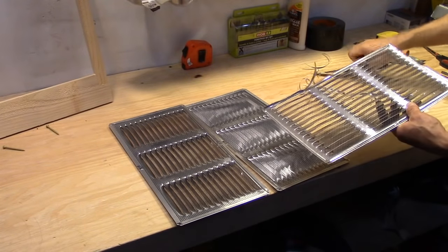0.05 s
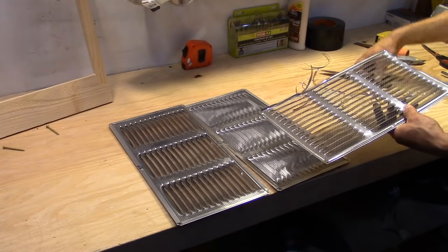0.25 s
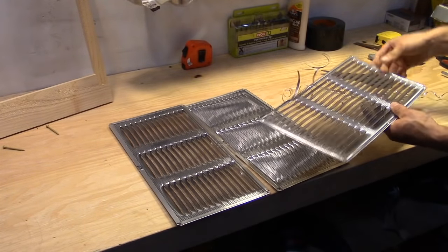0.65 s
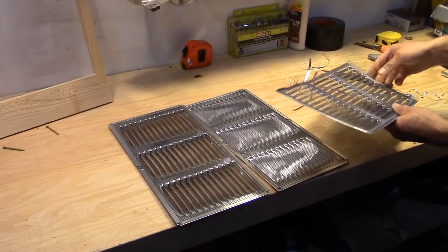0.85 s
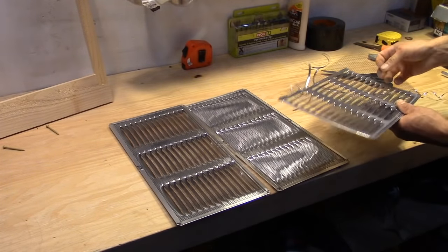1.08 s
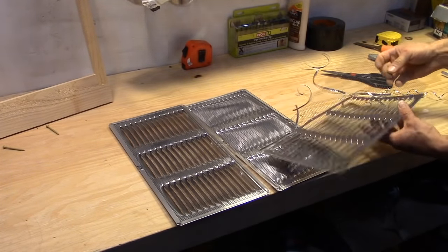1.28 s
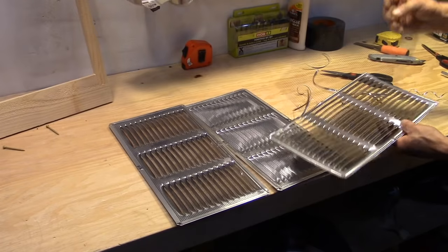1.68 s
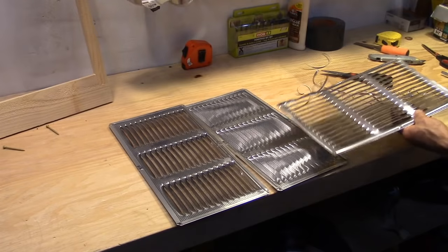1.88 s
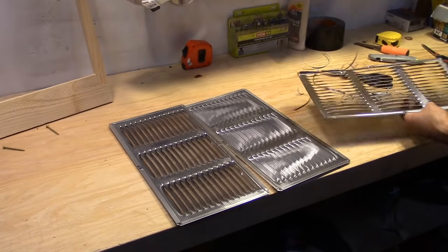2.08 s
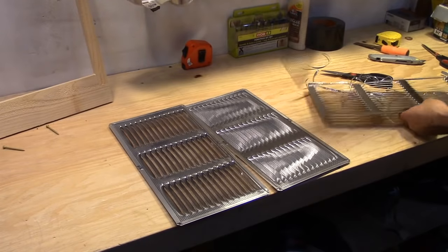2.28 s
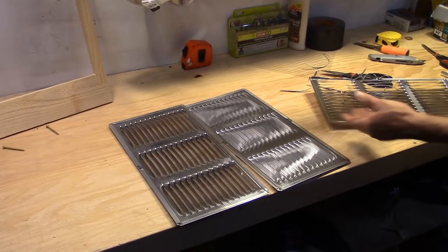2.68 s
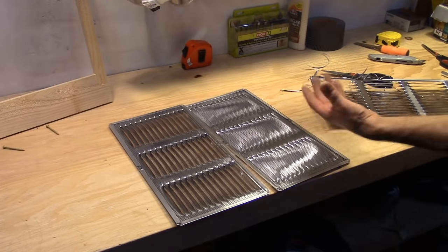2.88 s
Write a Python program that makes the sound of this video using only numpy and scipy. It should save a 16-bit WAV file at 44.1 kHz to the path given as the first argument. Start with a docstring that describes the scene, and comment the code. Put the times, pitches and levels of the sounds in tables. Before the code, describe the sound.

A thin steel grille rattles against another panel, then clatters down among tools on a wooden workbench. Just before, a hand tool is set down with two sharp knocks. The microphone is close, in a small, live workshop.

```python
"""A small, live workshop, heard in mono from one microphone near the wooden workbench.
Over room air and a faint hum, a dull scuff dies away and a hand tool is put down with two sharp knocks,
tip first, then the whole body, ringing the bench. A thin slotted steel grille is turned in the fingers,
brushes another panel from about 1.2 s and is laid down among the tools from about 2.3 s.
Every contact chatters, rings its slats and thuds into the wood, and the walls answer."""
import sys
import numpy as np
from scipy import signal
from scipy.fft import rfft, irfft
from scipy.io import wavfile
from scipy.ndimage import uniform_filter1d

SR = 44100
rng = np.random.default_rng(int(sys.argv[2]) if len(sys.argv) > 2 else 0)


def bounce(signal):
    """Save signal as a 16-bit WAV file at the path given by the first command-line argument."""
    frames = np.transpose(np.atleast_2d(signal))
    limited = np.clip(frames, -1, 1)
    pcm = np.round(limited * 32767).astype(np.int16)
    wavfile.write(sys.argv[1], SR, pcm)


N = 134505
T = np.arange(N) / SR
RING_T = T[:24576]  # time axis of one impact or echo

# Spectra of the room air and the scuff. Each row: frequency in Hz, level in dB.
AIR_SPECTRUM = [(30, -37.5), (184, -9), (449, -8.5), (486, -7.5), (702, -6.5), (1130, -8.5), (16000, -27)]
SCUFF_SPECTRUM = [(100, -28), (458, 1.5), (4150, -16), (8040, -20), (12000, -20), (15600, -70)]
# The hum. Each row: frequency in Hz, starting level in dB, fall in dB per second.
HUM_TONES = [(132, -66, 15.5), (282, -65, 4.5), (477, -64, 3.5)]
# Reverberation of the workshop. Each row: frequency in Hz, t60 in seconds.
ROOM_DECAY = [(200, 0.61), (1000, 0.45), (4000, 0.42), (8000, 0.24), (15000, 0.13)]
# Grille contacts; at 0.33 s the knock shakes the panels on the bench. Each row: start in seconds,
# level in dB, chatter time in seconds, tilt in dB per octave, relative thud level in dB.
GRILLE_CONTACTS = [ (0.0132, -40.5, 0.0012, -3, 0), (0.0464, -49, .001, 3, -28),
                   (0.3300, -28, 0.085, -7.5, -19), (1.1883, -45, 0.014, -7.5, -18),
                   (1.2041, -37.5, 0.065, 1, -34), (1.2601, -21, 0.075, -1, -22.5),
                   (1.2999, -15, 0.0082, -1.5, -24), (1.316, -20.5, 0.048, -4, -14),
                   (1.4119, -24.5, 0.031, -3.5, -14.5), (1.4660, -19, 0.039, -2, -11.5),
                   (1.4901, -17, 0.01, -2, -21), (1.6171, -34.5, 0.023, -4.5, -9),
                   (1.718, -38.5, 0.0049, -4, -44), (1.765, -51, 0.006, -4, -28),
                   (1.849, -45.5, 0.012, -1.5, -35), (1.8930, -49, .003, 0, -51),
                   (2.263, -21.5, 0.0032, -1, -22), (2.2668, -13.5, 0.00072, 3.5, -23),
                   (2.289, -16, 0.01, -3, -45), (2.3140, -14, 0.009, 3, -47),
                   (2.3218, -16, 0.0057, -3.5, -14), (2.4034, -22.5, 0.014, -4.5, -27),
                   (2.4469, -22, 0.05, -5.5, -15), (2.5165, -14, 0.044, -2, -20),
                   (2.533, -10.5, 0.014, 2, -31.5), (2.5520, -15, 0.011, -3.5, -29),
                   (2.5648, -18.5, 0.0064, -5.5, -36), (2.5820, -19.5, 0.011, -3.5, -49),
                   (2.6028, -14.5, 0.011, -0.5, -30.5), (2.6400, -19.5, 0.074, -6, -16.5),
                   (2.6937, -23.5, 0.0072, -3.5, -17), (2.756, -32, 0.023, -6, -10),
                   (2.771, -26.5, 0.015, -1, -44), (2.8218, -26, 0.014, -3.5, -20)]
# Strongest modes of the slats. Each row: frequency in Hz, level in dB.
SLAT_MODES = [(2293, -1), (3340, -2.5), (3520, -6.5), (3957, -2.5), (4791, -0.5), (6050, -21), (6980, -1),
              (7876, 0), (8737, -2), (9494, -5), (10515, -2.5), (11504, -9), (12112, 1), (13407, 2)]
# Spectra of the steel, its added colour against the other panel, and its thud in the bench.
# Each row: frequency in Hz, level in dB.
STEEL_SPECTRUM = [(150, -31), (400, -31.5), (1000, -13.5), (1900, -12.5), (2300, -7), (2800, -4.5),
                  (3400, -0.5), (4400, -2.5), (8200, 4), (11000, 6.5), (16000, -3.5)]
ON_PANEL_COLOUR = [(4000, 1), (8500, 2.5), (13500, -4)]
THUD_SPECTRUM = [(100, -48), (220, -17), (320, -5.5), (540, 5.5), (850, 3), (1200, 5.5), (2000, -2.5),
                 (16000, -72)]
# Knocks of the tool. Each row: start in seconds, level in dB, nominal t60 in seconds,
# relative echo level in dB, part that lands (0 tip, 1 whole body).
TOOL_KNOCKS = [(0.2335, -14.5, 0.021, -6, 0), (0.299, -32, 0.08, 2, 0), (0.306, -22, 0.032, -21, 1),
               (0.3138, -9, 0.034, -4, 1)]
# Spectra of the tip and the whole tool on wood. Each row: frequency in Hz, level in dB.
TIP_SPECTRUM = [(120, -27), (200, -11.5), (305, -14.5), (456, 5.5), (722, -10.5), (990, 2.5), (1350, -9.5),
                (1530, 3.5), (2080, -14), (2510, -0.5), (2910, -15), (3190, 0.5), (3970, -13), (4650, -2),
                (6400, -19.5), (7300, -2), (9400, -19), (11100, -17.5), (16000, -63)]
BODY_SPECTRUM = [(59, -66), (110, -35), (235, -29.5), (315, -12), (385, -28.5), (465, -12), (558, -8),
                 (670, -15), (768, -6), (891, -16.5), (1060, -8), (1520, -20), (1760, -6.5), (2400, -25),
                 (2750, -12.5), (3700, -10.5), (4250, -16.5), (6700, -12), (16000, -40.5)]
# Bench modes. Each row: frequency in Hz, level in dB, t60 in seconds before division by BENCH_DAMPING.
BENCH_MODES = [(553.3, 19, 0.28), (797, 4, 1), (1520, 22, 0.28), (1687, 3, 0.33)]
# The grille sliding in the fingers. Each row: time in seconds, level in dB.
SLIDE_LEVELS = [(0.735, -75), (0.76, -52.5), (0.85, -54), (1.02, -50), (1.05, -51.5), (1.26, -55),
                (1.9, -64), (2.0, -83), (2.21, -52.5), (2.26, -65)]
# An edge catches and one slat sings. Each row: start in seconds, frequency in Hz, level in dB.
SLAT_ZINGS = [(0.999, 2300, -51), (1.205, 3030, -46), (1.303, 7030, -26.5), (1.312, 3303, -24),
              (1.41, 4920, -33), (1.720, 3510, -44), (1.893, 12900, -54), (2.269, 4890, -24.5),
              (2.322, 10550, -20.5), (2.640, 3300, -28.5), (2.791, 6130, -35)]

ROOM_DELAY_S, ROOM_BUILD_S = 0.0058, 0.0065
SCUFF_DB, SCUFF_HOLD_S, SCUFF_FALL_DB_PER_S = -46.5, 0.086, 127
SLAT_DB, SLAT_T60_S, CLASH_T60_S = -8.5, 0.074, 0.063
CHATTER_PER_S = 650
BENCH_DB, BENCH_DAMPING = -18.5, 0.9
TIP_ECHO_TOP_HZ, BODY_ECHO_TOP_HZ = 4330, 7000  # the knocks' treble reaches the walls weakly


def amp(db):
    """Decibels to gain."""
    return 10 ** (np.asarray(db) / 20)


def unit(x):
    """Scale to rms 1."""
    return x / np.sqrt(np.mean(x ** 2))


def blow(x):
    """Scale to the energy of 10 ms at rms 1."""
    return x * np.sqrt(.01 * SR / np.sum(x ** 2))


def fade(t60):
    """Exponential decay, 60 dB down after t60 seconds."""
    return np.exp(-np.log(1000) * RING_T / max(t60, 1e-3))


def burst(t60):
    """Decaying noise: countless heavily damped modes."""
    return rng.standard_normal(len(RING_T)) * fade(t60)


def crack(t60):
    """A burst with an even spectrum."""
    spectrum = rfft(burst(t60))
    local_power = uniform_filter1d(np.abs(spectrum) ** 2, size=40)
    return irfft(spectrum / np.sqrt(local_power)) * fade(10 * t60)


def clicks(size, per_s):
    """Random tiny impacts of uneven strength."""
    return (rng.random(size) < per_s / SR) * rng.standard_normal(size)


def ring(modes):
    """Damped sines (Hz, dB, t60 s), struck at a random spot."""
    return blow(sum(amp(db) * fade(t60) * np.sin(2 * np.pi * (hz * RING_T + rng.random()))
                    for hz, db, t60 in modes))


def through(x, response):
    """Play x through an impulse response."""
    return signal.fftconvolve(x, response)[:len(x)]


def colour(x, points, tilt_db=0):
    """Causal filter from (Hz, dB) points, tilted by tilt_db per octave above 2 kHz."""
    hz, db = np.array(points).T
    octave = np.log2(np.maximum(np.fft.rfftfreq(4096, 1 / SR), 1))
    tilt = tilt_db * np.maximum(octave - np.log2(2000), 0)
    gain = amp(np.interp(octave, np.log2(hz), db) + tilt)
    cepstrum = irfft(np.log(gain))
    half = len(cepstrum) // 2
    cepstrum *= np.r_[1, np.full(half - 1, 2), np.zeros(half)]  # minimum phase
    return through(x, irfft(np.exp(rfft(cepstrum))))


def add(track, start, x):
    """Mix x into the track at a time in seconds."""
    i = int(start * SR)
    track[i:i + len(x)] += x[:N - i]


def room_tone(air_db=-55):
    """Quiet air all around the microphone and a faint hum that fades."""
    hum = sum(np.sqrt(2) * amp(db - fall * T) * np.sin(2 * np.pi * (hz * T + rng.random()))
              for hz, db, fall in HUM_TONES)
    air = unit(colour(rng.standard_normal(N), AIR_SPECTRUM))
    return amp(air_db) * air + hum


def scuff():
    """Dense friction ticks on the wood make a dull scuff that dies away."""
    friction = unit(colour(clicks(N, per_s=1300), SCUFF_SPECTRUM))
    return friction * amp(SCUFF_DB - SCUFF_FALL_DB_PER_S * np.maximum(T - SCUFF_HOLD_S, 0))


def room_echo():
    """Diffuse echo off the nearby walls builds up quickly; the treble dies first."""
    hz, t60s = np.array(ROOM_DECAY).T
    noise = rfft(rng.standard_normal(len(RING_T)))
    log_hz = np.log(np.fft.rfftfreq(len(RING_T), 1 / SR) + 1)
    bands = [irfft(noise * np.interp(log_hz, np.log(hz), share)) for share in np.eye(len(hz))]
    tail = sum(band * fade(t60) for band, t60 in zip(bands, t60s))
    tail *= np.clip((RING_T - ROOM_DELAY_S) / ROOM_BUILD_S, 0, 1)
    return tail / np.sqrt(np.sum(tail ** 2))


def grille_response(detune=0.0044):
    """The thin sheet clashes and its slats ring, detuned by flexing from contact to contact."""
    slats = ring([(hz * (1 + detune * rng.standard_normal()), db, SLAT_T60_S) for hz, db in SLAT_MODES])
    return blow(crack(CLASH_T60_S)) + amp(SLAT_DB) * slats


def grille_contacts(laid_down_s=2.1):
    """Each contact is a click and a dying chatter that ring the steel and thud into the bench."""
    out = np.zeros(N)
    for start, db, chatter_s, tilt_db, thud_db in GRILLE_CONTACTS:
        force = clicks(len(RING_T), CHATTER_PER_S) * np.exp(-RING_T / chatter_s)
        force[0] = 1.2  # the first click
        steel = blow(colour(through(force, grille_response()), STEEL_SPECTRUM, tilt_db))
        if start < laid_down_s:  # against the other panel; later it meets the tools
            steel = blow(colour(steel, ON_PANEL_COLOUR))
        thud = blow(colour(through(force, burst(t60=0.07)), THUD_SPECTRUM))
        add(out, start, amp(db) * (steel + amp(thud_db) * thud))
    return out


def tool_knocks(echo):
    """The tip touches and bounces, then the whole tool drops and the bench rings."""
    out = np.zeros(N)
    for start, db, t60, echo_db, whole in TOOL_KNOCKS:
        knock = blow(colour(crack(t60), BODY_SPECTRUM if whole else TIP_SPECTRUM))
        if whole:
            bench = ring([(hz, level, decay / BENCH_DAMPING) for hz, level, decay in BENCH_MODES])
            knock += amp(BENCH_DB) * bench
        top_hz = BODY_ECHO_TOP_HZ if whole else TIP_ECHO_TOP_HZ
        dull_echo = signal.sosfilt(signal.butter(2, top_hz, fs=SR, output="sos"), echo)
        add(out, start, amp(db) * (knock + amp(echo_db) * through(knock, dull_echo)))
    return out


def finger_slide():
    """Fine stick-slip ticks as the grille turns in the hand."""
    times, db = np.array(SLIDE_LEVELS).T
    ticks = through(clicks(N, per_s=250), grille_response())
    steel = unit(colour(ticks, STEEL_SPECTRUM, tilt_db=-5))
    sliding = (T > times[0]) * (T < times[-1])
    return steel * amp(np.interp(T, times, db)) * sliding


def slat_zings(scrape_s=0.014, t60=0.028):
    """An edge scrapes briefly and keeps one slat ringing."""
    out = np.zeros(N)
    for start, hz, db in SLAT_ZINGS:
        scrape = clicks(len(RING_T), CHATTER_PER_S) * np.exp(-RING_T / scrape_s)
        slat = ring([(hz, 0, t60)])
        add(out, start, amp(db) * blow(through(scrape, slat)))
    return out


def scene(grille_echo_db=-3.5, low_cut_hz=292):
    """Bench and room as they reach the microphone, the same in both channels."""
    echo = room_echo()
    metal = grille_contacts() + finger_slide() + slat_zings()
    handling = tool_knocks(echo) + metal + amp(grille_echo_db) * through(metal, echo)
    # small objects radiate little bass
    low_cut = signal.butter(2, low_cut_hz, "high", fs=SR, output="sos")
    mono = signal.sosfilt(low_cut, handling) + scuff() + room_tone()
    return np.array([mono, mono])


def record(dry):
    """The recorder flattens only the very loudest peaks and cuts the top."""
    ceiling, top_hz = 0.78, 15800
    flattened = np.clip(dry, -ceiling, ceiling)
    return signal.sosfilt(signal.ellip(12, .2, 90, top_hz, fs=SR, output="sos"), flattened)


dry = scene()
out = record(dry)
bounce(out)
```